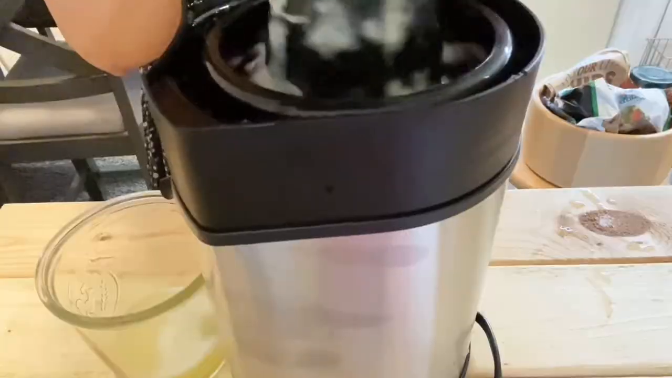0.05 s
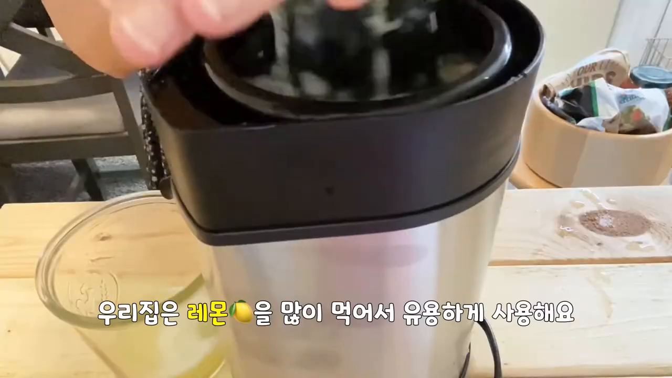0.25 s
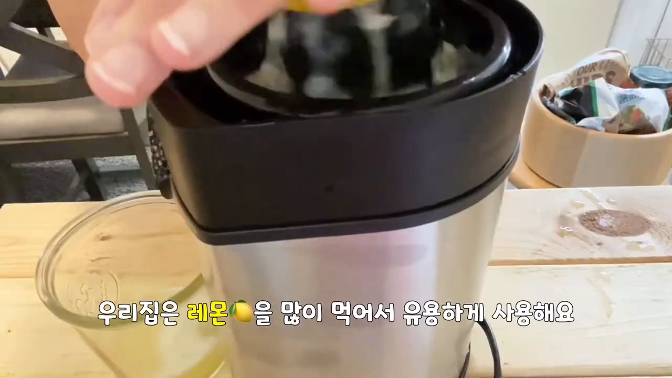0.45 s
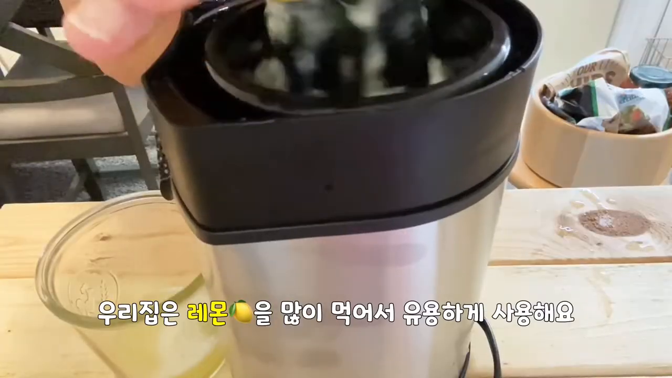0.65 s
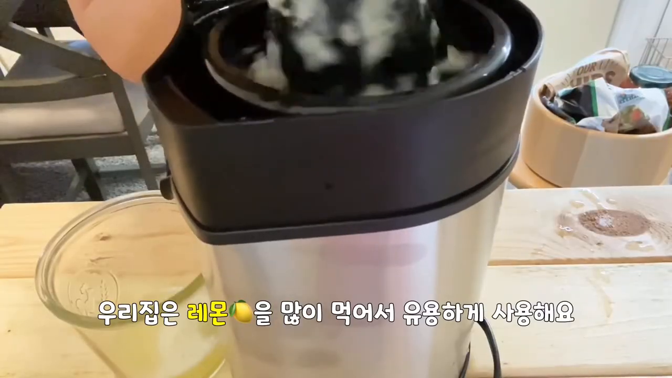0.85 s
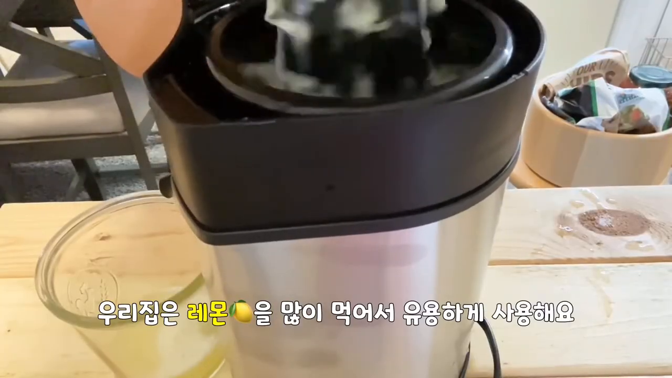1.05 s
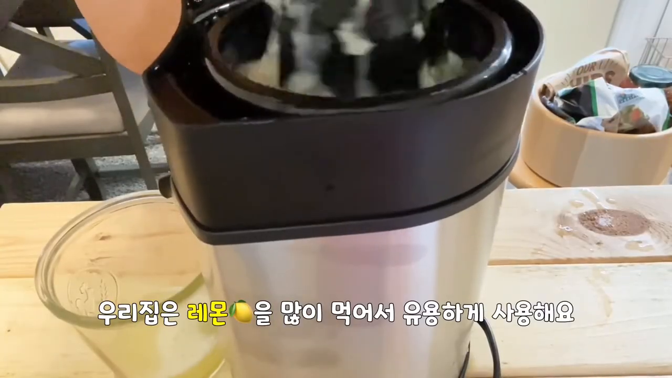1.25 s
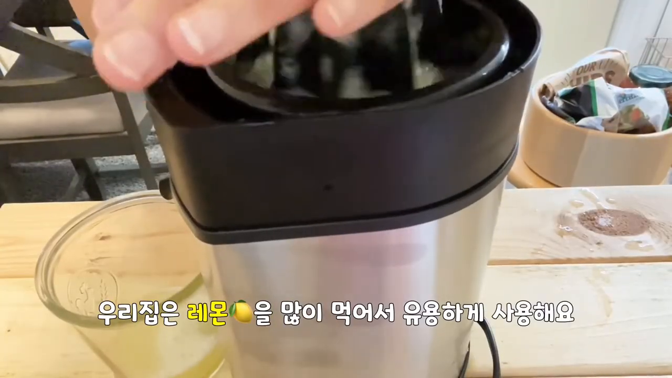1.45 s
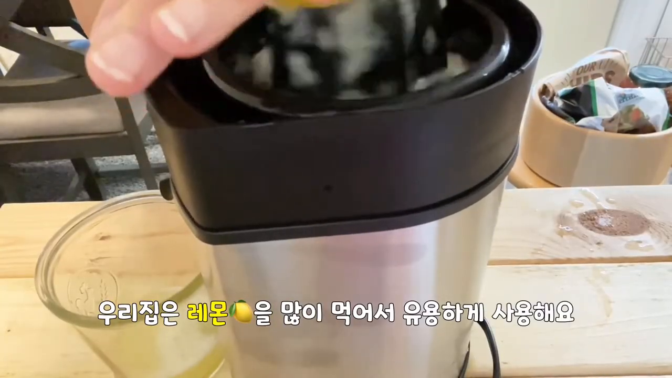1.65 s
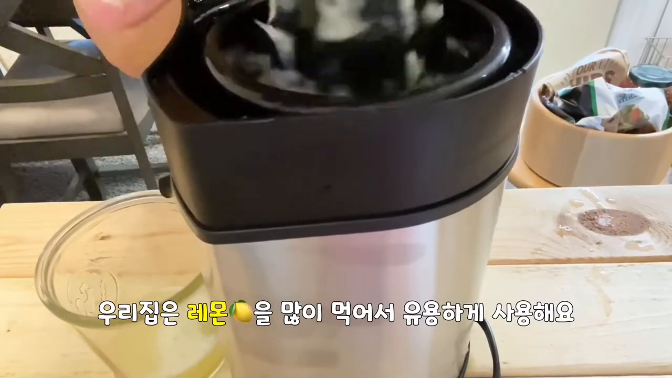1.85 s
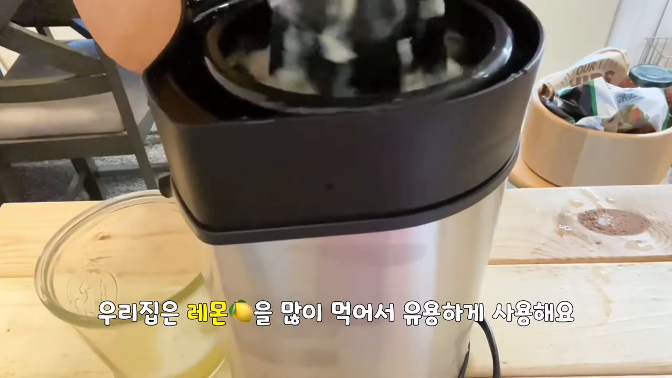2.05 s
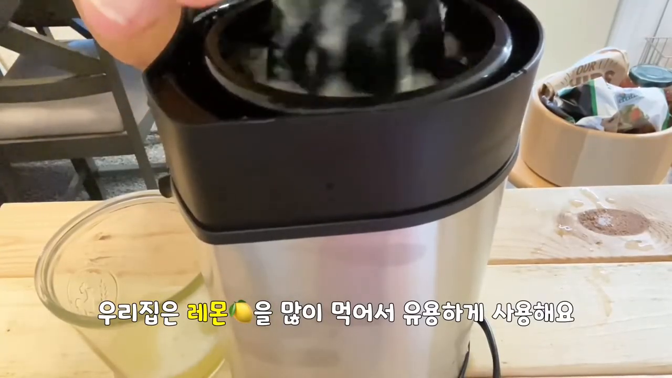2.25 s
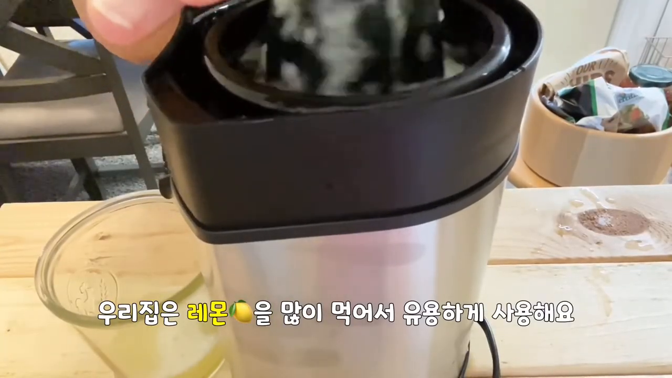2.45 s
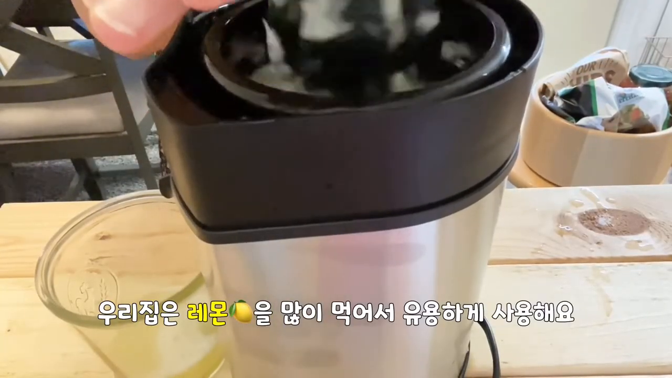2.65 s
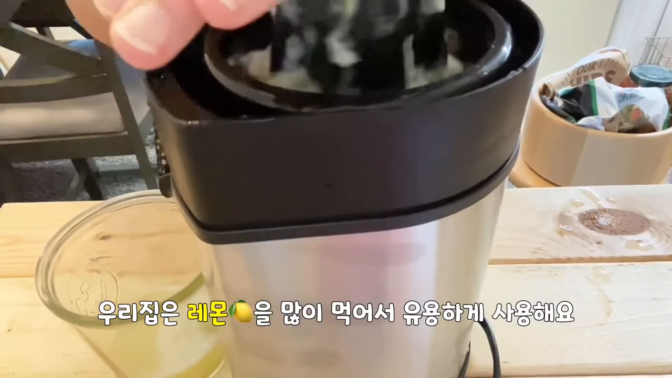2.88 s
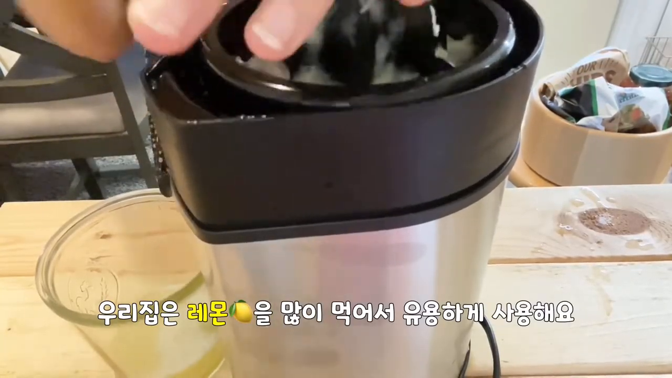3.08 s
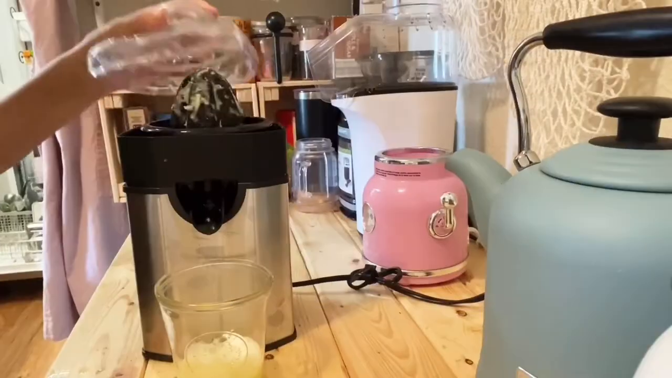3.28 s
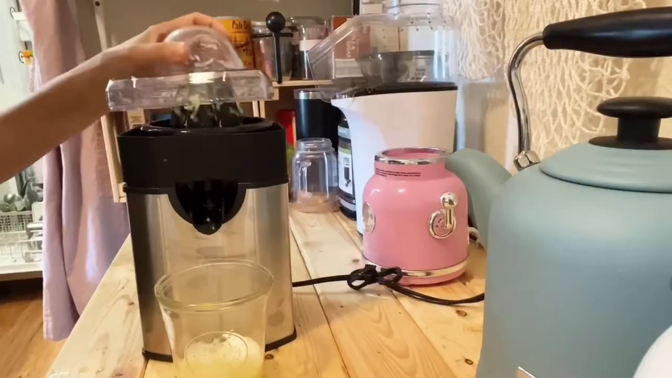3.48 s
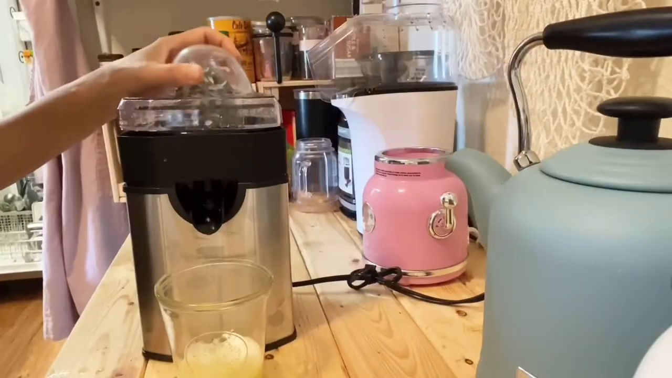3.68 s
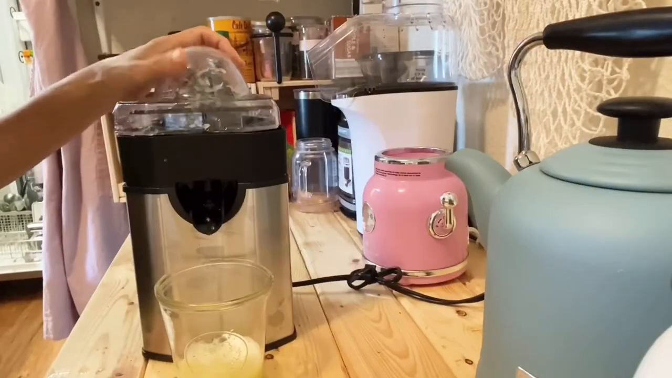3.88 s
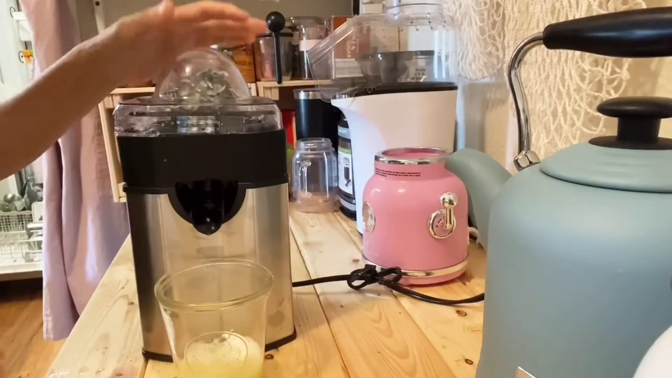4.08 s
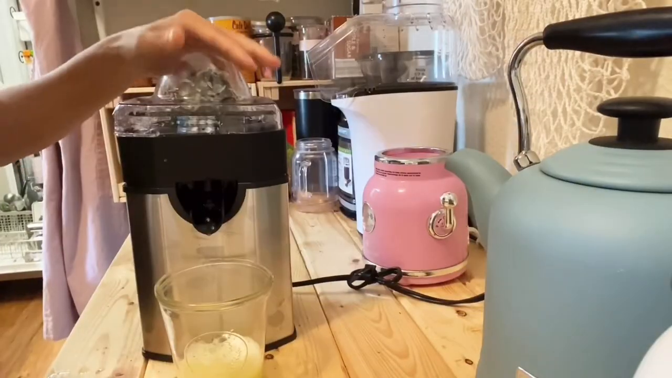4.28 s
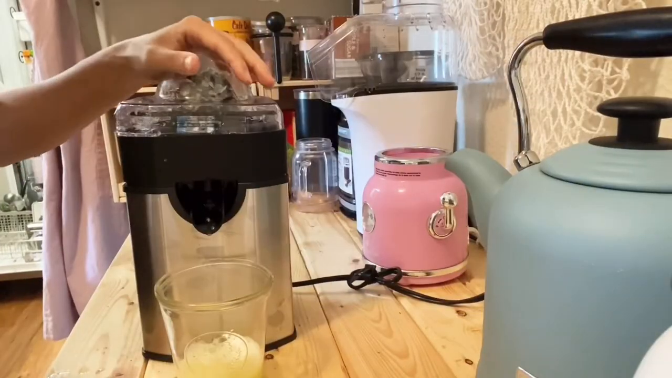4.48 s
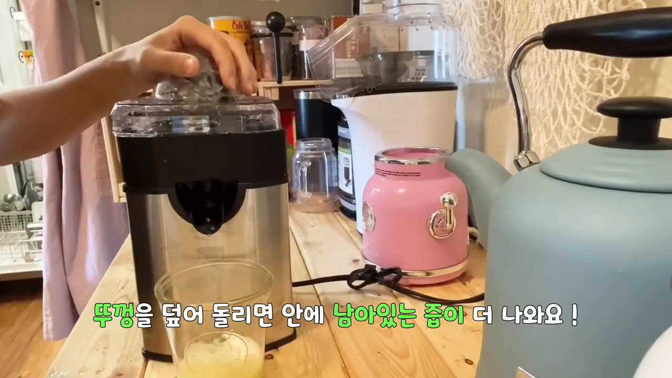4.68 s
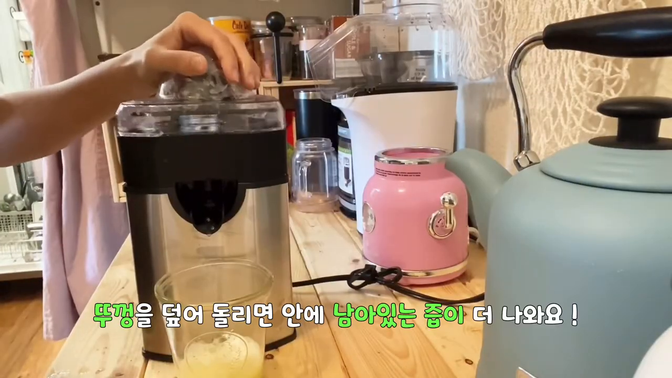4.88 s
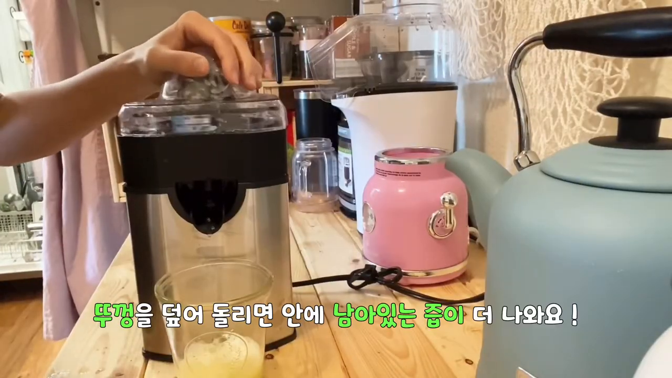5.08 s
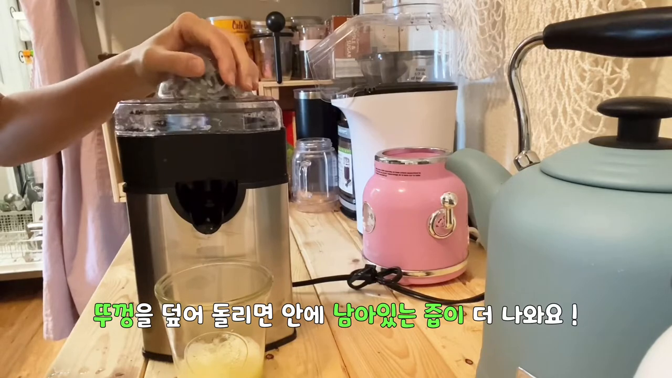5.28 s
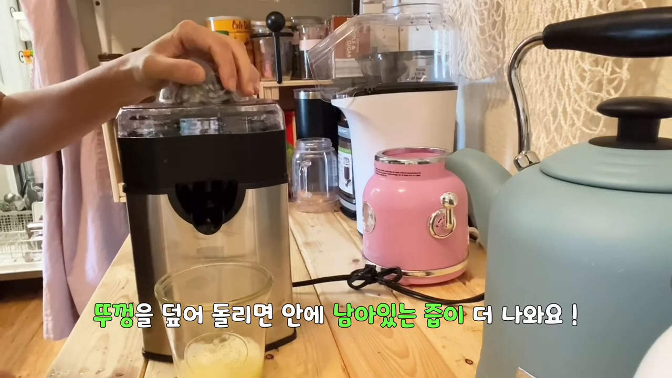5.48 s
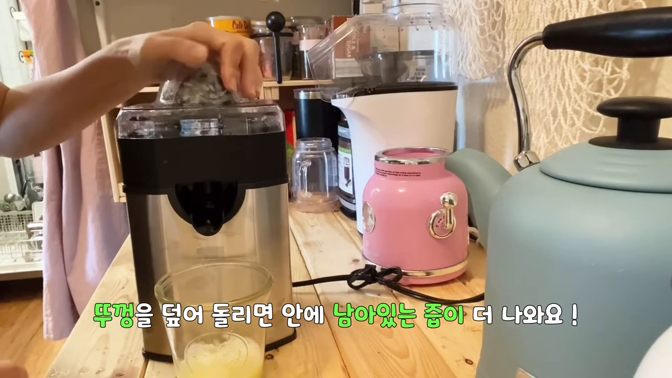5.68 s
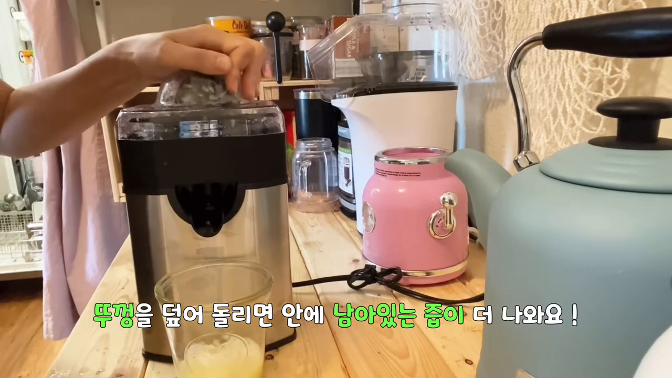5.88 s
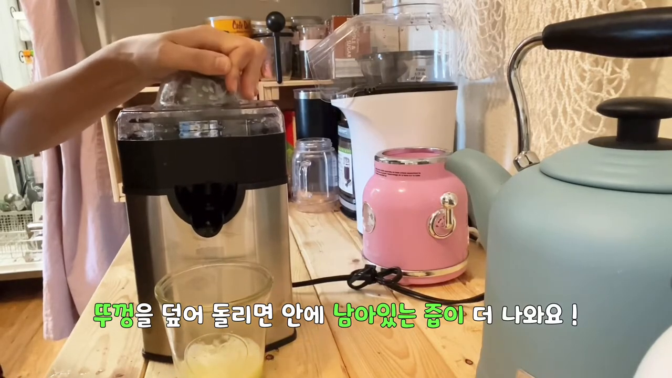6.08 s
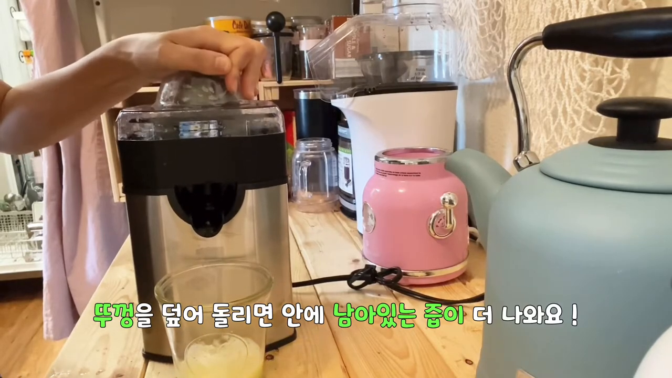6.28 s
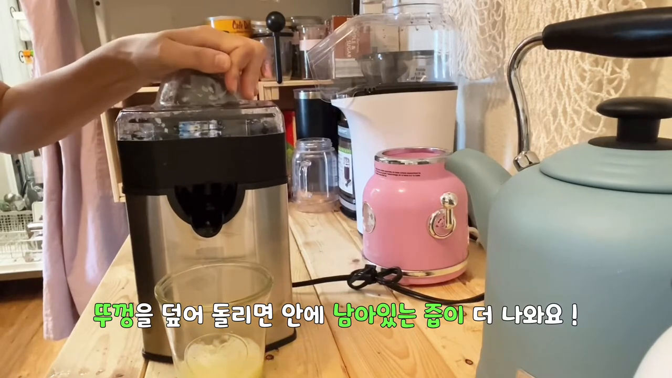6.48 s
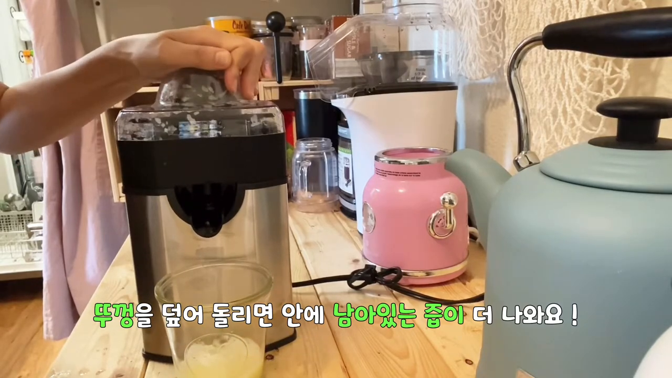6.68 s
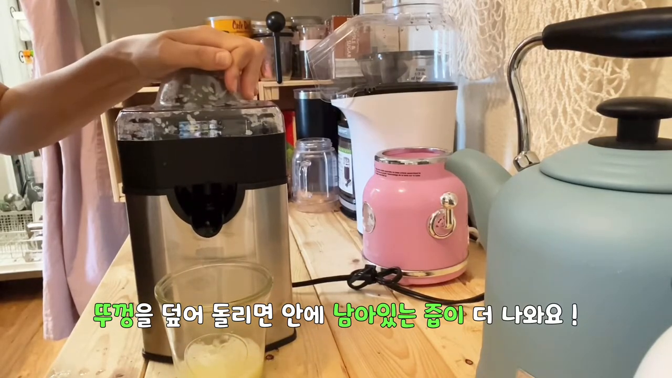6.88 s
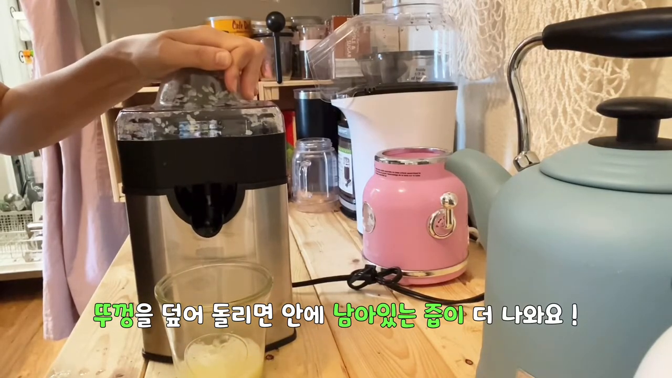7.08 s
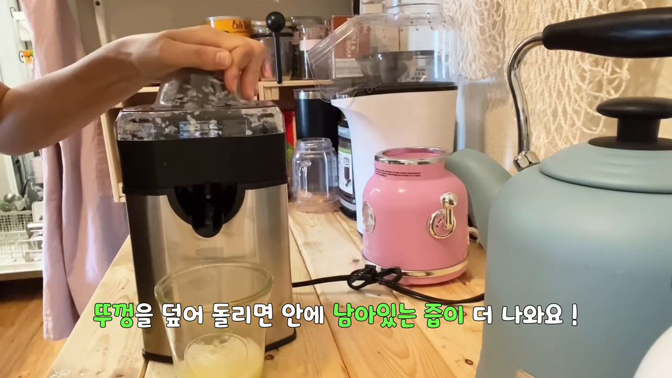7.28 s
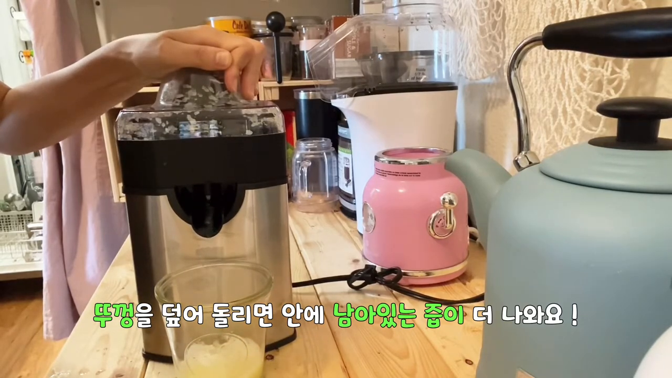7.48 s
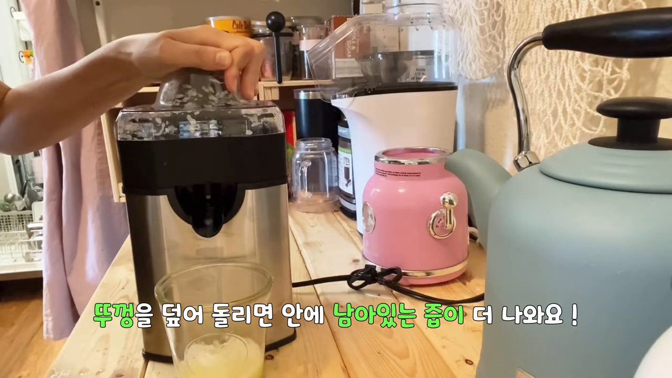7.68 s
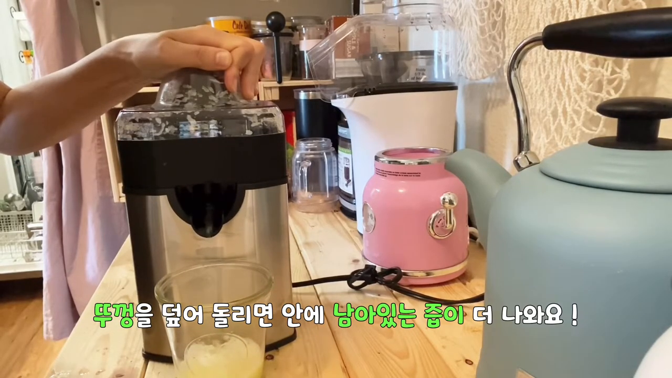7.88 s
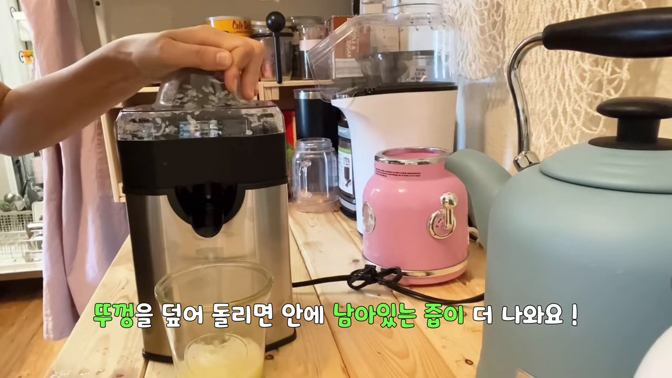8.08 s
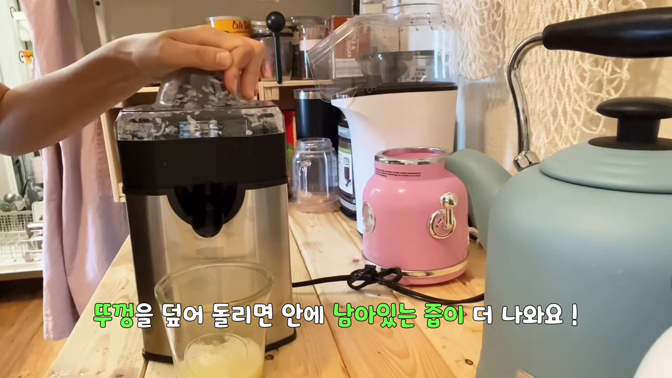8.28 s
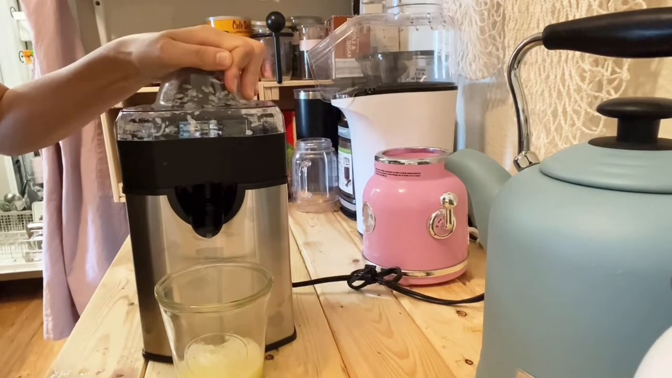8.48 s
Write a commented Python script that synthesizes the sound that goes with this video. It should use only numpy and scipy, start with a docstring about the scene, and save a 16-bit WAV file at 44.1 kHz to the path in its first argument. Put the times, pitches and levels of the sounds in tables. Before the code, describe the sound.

Close in a home kitchen, a small electric citrus juicer runs with buzzing mains hum, rattling gears and wet pulp crunches. It stops abruptly at three seconds. A hollow plastic lid is knocked, scraped and snapped on over faint appliance murmur. Then a few hard clacks, a quick rising whine, and the motor runs again, growing into a grind with lid chatter and squeaks to the end.

```python
"""A bare electric citrus juicer is heard first, its mains-locked motor humming and its gears rattling on a wooden table.
After a sudden stop a plastic lid is set on, nudged and snapped home; a hand presses it, the drive catches with a few
clacks and the lid chatters on the spinning reamer. Sine lines give the hum and drone; random strikes and noise, filtered
by resonant bodies, give gears, rumble and chatter; short noise bursts give the knocks. Appliances murmur behind."""
import sys
import numpy as np
from scipy import signal
from scipy.fft import rfft, irfft, next_fast_len
from scipy.io import wavfile
from scipy.ndimage import uniform_filter1d

SR = 44100
rng = np.random.default_rng(int(sys.argv[2]) if len(sys.argv) > 2 else 0)


def master_out(mix):
    """Clip the mix to full scale and print it as 16-bit PCM to the path in sys.argv[1]."""
    frames = np.transpose(np.atleast_2d(mix))
    ceiling = np.clip(frames, -1, 1)
    pcm = np.round(ceiling * 32767).astype(np.int16)
    wavfile.write(sys.argv[1], SR, pcm)


N = 376613
T = np.arange(N) / SR  # time, s
LEFT_RIGHT = np.array([[1], [-1]])  # opposite signs on the two sides

# Motor lines. Each row: multiple of the mains frequency, level in dB bare, lightly pressed, pressed hard.
MOTOR_LINES = [(1.992, -35, -52, -53), (4.003, -41, -51, -46), (5.97, -51, -59, -51),
               (8.026, -35.5, -49, -52), (9.96, -36, -43, -51), (12.01, -39, -38.5, -39.5),
               (12.93, -49.5, -54, -41), (14.1, -64.5, -38.5, -37.5), (15.15, -37, -47, -44),
               (15.92, -52.5, -35.5, -38), (16.9, -40, -40, -38.5), (18.02, -41, -54, -48.5),
               (25.5, -54, -49, -57), (28.3, -59.5, -41, -50), (29.6, -54.5, -50, -43)]
# Drone of the loaded drive. Each row: frequency in Hz, level in dB against the rumble.
DRIVE_DRONE = [(81.5, -22), (107.5, -15), (143, -1), (179.5, -6)]

# Broad colours of the parts. Each row of these: frequency in Hz, relative spectral level in dB per Hz.
# Gears and table under the bare reamer
BARE_GEAR_COLOUR = [(230, -36), (330, -19), (450, -11), (530, -7), (800, -1), (1000, -6), (1400, -11),
                    (2300, -18), (4200, -27), (7400, -26), (9400, -29), (13800, -33), (15200, -54)]
BARE_RUMBLE_COLOUR = [(15, -32), (25, -27), (70, -4), (118, -2.5), (192, -4.5), (241, -12), (290, -15),
                      (330, -25), (430, -39), (730, -120)]
# Gears of the lightly loaded drive, then of the pressed one
IDLE_GEAR_COLOUR = [(30, -50), (150, -28), (350, -20), (520, -10), (700, -6), (900, -4), (1030, -6),
                    (1200, -18), (1480, -12.5), (1780, -12), (2200, -17), (2450, -27), (3500, -31),
                    (4600, -31), (5500, -36), (7400, -35), (8200, -41), (13500, -46), (15000, -66)]
LOADED_GEAR_COLOUR = [(30, -62), (150, -26), (300, -11.5), (420, -5.5), (550, -8), (680, -6), (880, -2),
                      (1030, -2), (1200, -15.5), (1700, -10.5), (2200, -19.5), (2900, -20), (6000, -40),
                      (15000, -95)]
# Chatter of the lid, rumble of the table, and what a rib excites in the lid
CHATTER_COLOUR = [(40, -50), (600, -22), (1500, -4), (2200, 1), (3000, -3), (4400, -2), (5200, -7),
                  (7400, -9), (9300, -13), (13500, -17), (15000, -38)]
PRESSED_RUMBLE_COLOUR = [(25, -32), (40, -19), (55, -12), (90, 9.5), (150, 2.5), (210, -3), (300, -3.5),
                         (450, -41.5)]
RIB_BRUSH_COLOUR = [(40, -48), (800, -4.5), (1600, 5), (2200, 4), (3100, -4), (3950, 2), (4500, -7),
                    (5400, -1), (7500, -24), (15000, -52)]
# Lid knocks and scrapes, hard clacks, rib ticks and dull judders
KNOCK_COLOUR = [(60, -9), (250, -1.5), (400, 0), (600, 8.5), (950, 1), (1300, -3.5), (1700, -2.5),
                (2300, -8.5), (3400, -13), (4500, -19), (9000, -30), (16000, -52)]
CLACK_COLOUR = [(80, -6.5), (300, -4.5), (600, -0.5), (900, 7), (1300, -3.5), (2200, 1), (3200, -6.5),
                (5000, -7.5), (8000, -15.5), (14000, -37), (16000, -23.5)]
TICK_COLOUR = [(300, -18), (900, 9.5), (1400, 7), (2200, 15.5), (3000, 1.5), (4300, 1.5), (5800, -4),
               (9000, -7), (15000, -51)]
JUDDER_COLOUR = [(100, -26.5), (400, -19), (650, -8), (880, -1), (1100, -6.5), (1500, -21), (2200, -9),
                 (4000, -33), (15000, -72)]
# Pulp on the strainer, and the murmur of the kitchen
STRAINER_COLOUR = [(300, -8.5), (1400, 2.5), (3800, 3), (8000, -12)]
KITCHEN_COLOUR = [(25, -20), (51, -4.5), (72, -7), (140, -7), (190, -16), (260, -16), (600, -28),
                  (1000, -31), (1400, -36), (2400, -40), (4000, -54), (8000, -60), (15000, -85)]

# Resonances. Each row of these: frequency in Hz, width in Hz, height in dB above the colour.
# Housing with the reamer bare
HOUSING_MODES = [(467.7, 15, 9), (575, 89, 2), (717, 17, 7), (836, 103, 7), (1078, 41, 10.5),
                 (1302, 33, 5.5), (1940, 48, -3), (2248, 14, 7.5), (2800, 25, 5.5), (2724, 5.1, 9),
                 (3730, 74, 7), (7390, 440, 6.5), (8600, 330, 3.5), (11560, 210, -1.5), (13100, 370, 3.5)]
# Lightly loaded drive
IDLE_MODES = [(681, 17, 9.5), (880, 270, 5), (1430, 25, 9), (1540, 31, 8), (1760, 130, 4.5), (2130, 25, 6),
              (2560, 35, 11), (3000, 94, 8), (3300, 110, 9), (4460, 92, 7), (5900, 220, 10.5),
              (6460, 94, 10), (7300, 320, 8)]
# Housing covered by the lid
COVERED_MODES = [(513, 50, 9), (570, 38, 11.7), (734, 13, 10), (883, 69, 8.6), (1020, 2.8, 4.2),
                 (1222, 18, 11.4), (1780, 880, 3.6), (3930, 95, 5.4), (4540, 160, 8), (7520, 1200, 4)]
# Upper resonances of the lid
LID_MODES = [(1654, 70, 7), (2200, 90, 7), (2910, 60, 7), (3360, 90, 9)]
# Seated lid on its housing, damped by the hand
SEATED_MODES = [(560, 110, 7.5), (890, 140, 6), (1770, 900, 3), (3880, 200, 4), (4500, 200, 4)]

# How far the two sides differ. Each row of these: frequency in Hz, side against middle in dB.
BARE_SIDES = [(100, -15), (300, 2), (950, -15), (1800, 3), (4000, 1), (7000, -3), (14000, 1)]
PRESSED_SIDES = [(100, -43), (300, -20), (550, -7), (950, 4), (1800, -18), (4000, -17), (7000, -1)]
HANDLING_SIDES = [(100, -18), (500, -2), (1500, -5.5), (7000, -2.5)]

# The hand bears down, then eases a little. Each row: time in seconds, gear level in dB.
HAND_EFFORT = [(5.98, -32.5), (6.53, -28.5), (7.06, -19.5), (8.01, -22), (8.54, -23)]
# The pressed lid shudders in short bursts. Each row: pitch in Hz, length in seconds, bursts per second,
# level in dB against the chatter.
LID_SHUDDERS = [(873, 0.0076, 30, 9), (2074, 0.0038, 70, 4.5), (3880, 0.0052, 40, -4),
                (4480, 0.0048, 45, -5.5)]
# The lid slides on the rim. Each row: start in seconds, length in seconds, level in dB.
LID_SCRAPES = [(3.739, 0.069, -33), (3.801, 0.048, -45), (3.877, 0.15, -45.5), (3.99, 0.085, -45),
               (4.378, 0.075, -66), (4.634, 0.038, -53.5), (4.91, 0.03, -54), (5.143, 0.036, -47),
               (5.339, 0.024, -43), (5.354, 0.29, -59.5), (5.675, 0.13, -65.5)]
# The lid knocks on the rim. Each row: start in seconds, contact peak in dB, rattle length in seconds,
# low ring in Hz, its level in dB, upper ring in Hz, its level in dB, ring t60 in seconds, left minus right in dB.
LID_KNOCKS = [(3.6988, -22.5, .014, 684, -22, 1585, -25.5, 0.098, -1.5),
              (3.757, -17.5, 0.017, 635, -24, 1467, -12.5, 0.067, .5),
              (3.765, -18.5, 0.013, 620, -21.5, 1614, -16, 0.093, -1),
              (3.78, -26.5, 0.01, 666, -32, 1460, -23, 0.073, 0),
              (3.9427, -27, 0.0096, 574, -19.5, 1440, -27, 0.1, 1.5),
              (3.96, -22.5, 0.0098, 604, -31, 1460, -36, .07, -2),
              (3.977, -18, .012, 560, -14.5, 1524, -16.5, 0.08, 0),
              (3.996, -19, .003, 583, -18, 1290, -23, 0.049, -1.5),
              (4.019, -30, .015, 557, -25.5, 1200, -28.5, 0.091, .5),
              (4.4165, -34, 0.0074, 520, -32.5, 1570, -56, 0.073, 2),
              (4.574, -61, 0.0048, 520, -52, 1500, -62, .04, 0),
              (4.654, -34, 0.0058, 530, -23, 1600, -44, 0.048, 2),
              (4.668, -34.5, 0.012, 567, -35, 2080, -42, .04, -1.5),
              (4.799, -32, 0.015, 488, -27, 1410, -36, .06, .5),
              (4.821, -30.5, 0.0089, 500, -30, 1630, -46, 0.054, -1),
              (4.932, -29.5, 0.0055, 535, -37, 1600, -38, 0.049, .5),
              (4.948, -26, 0.015, 450, -30, 1630, -40, 0.048, 1),
              (4.9688, -18, 0.009, 503, -19, 1470, -28, 0.055, 1),
              (5.008, -40, .02, 450, -33, 1450, -35, 0.058, 0),
              (5.162, -24, 0.013, 466, -17.5, 1480, -24, 0.037, 2),
              (5.18, -20.5, .009, 576, -23, 1670, -30, 0.068, 0)]
# The hollow body thumps on the table. Each row: start in seconds, peak in dB, pitch in Hz, t60 in seconds.
BODY_THUMPS = [(3.769, -38, 227, 0.19), (4.002, -30.5, 108, 0.2), (4.04, -32, 125, 0.15),
               (4.965, -28, 135, 0.14), (5.236, -27, 133, 0.074), (5.378, -3, 220, 0.026),
               (5.38, -22.5, 122, 0.2)]
# The drive ticks, catches and kicks; the lid snaps home. Each row: start in seconds, peak in dB,
# brightness in dB per octave, main ring in Hz.
HARD_CLACKS = [(0.322, -12.5, 14.5, 12300), (5.353, -7.5, 0, 2340), (5.361, -8, -6.5, 500),
               (5.3711, -12, 3.5, 373), (5.803, -30.5, 7, 3960), (5.8094, -19.5, -1.5, 960),
               (5.83, -15, -1, 910), (5.8439, -4.5, -1.5, 2330), (5.8996, -10, -3, 4350),
               (5.922, -8, -1, 890), (5.9274, -3.5, -3.5, 860)]
# A rib of the reamer snags hard on the lid. Each row: start in seconds, tick peak in dB, squeak peak in dB,
# squeak pitch in Hz.
RIB_FLICKS = [(6.751, -20.5, -32, 4330), (6.9206, -16.5, -38, 3610), (6.9364, -10.5, -23, 4400),
              (6.9535, -15.5, -21, 4200), (7.0187, -25.5, -31, 4520), (7.0374, -12.5, -23, 3930),
              (7.072, -15, -14, 3950), (7.1166, -12.5, -14, 4470), (7.1827, -28.5, -21, 4460),
              (7.317, -25, -16.5, 4480), (7.334, -16, -20, 4560), (7.4666, -9.5, -12.5, 4560),
              (7.6388, -9.5, -21, 4070), (8.017, -18.5, -24, 4600), (8.1015, -16, -26, 4130),
              (8.201, -16.5, -24, 3900), (8.2338, -9.5, -25, 3860), (8.3578, -15.5, -23, 4000),
              (8.367, -12.5, -27, 4180), (8.417, -24.5, -19.5, 4580), (8.501, -9.5, -23, 3780)]
# Lumps of pulp crunch under the bare reamer. Each row: start in seconds, peak in dB, resonance in Hz.
PULP_CRUNCHES = [(0.2512, -16, 2270), (0.376, -15.5, 1780), (0.5003, -15, 1540), (0.535, -17.5, 1820),
                 (1.1345, -14, 2700), (1.137, -12, 1000), (1.9954, -23, 1580), (2.161, -18, 3300),
                 (2.454, -17.5, 1810), (2.6289, -16, 1520), (2.6853, -17, 1500), (2.705, -17, 1820),
                 (2.7767, -17, 1650)]
# The pressed lid judders. Each row: start in seconds, peak in dB.
LID_JUDDERS = [(6.902, -9.5), (6.95, -10.5), (7.069, -9), (7.106, -13.5), (7.12, -6.5), (7.192, -12.5),
               (7.257, -13), (7.29, -7), (7.3365, -5.5), (7.407, -9.5), (8.07, -9.5), (8.254, -8)]
# Steady tones of the appliances. Each row: frequency in Hz, level in dB.
APPLIANCE_TONES = [(70, -52), (188.4, -59), (527.6, -70.5), (1050, -72.5), (2272, -79.5), (6520, -99),
                   (6702, -90)]

MAINS_HZ, TOP_HZ = 60, 15500
BARE_STOP_S, PRESS_S = 3.095, 5.81
BARE_GEAR_DB = -23.5
# scraping grows as pulp gathers on the strainer; levels against the gears
PULP_DB, PULP_FROM_S, PULP_BUILD_S, PULP_GAIN_DB = -14, 2.08, 0.36, 5
CONTACT_S, CONTACT_RISE_S = 6.17, 0.89  # the lid comes to bear on the reamer
STRAIN_S, STRAIN_RISE_S = 6.28, 0.4  # the motor labours: its hum shifts and wavers
FULL_EFFORT_DB = -21  # gear level at which the next two levels hold
CHATTER_DB, CHATTER_DB_PER_DB = -37, 0.9  # level; growth with the gear level
RUMBLE_DB, RUMBLE_DB_PER_DB = -37.5, 1  # the same for the table's rumble
RIB_FROM_S, RIB_RISE_S, RIB_BRUSH_S = 6.8, 0.18, 0.0019  # the ribs reach the lid; time constant of one brush
RIB_HZ, RIB_JITTER = 46.9, .16  # rib passes per second; spread of their timing in periods
RIB_DB, RIB_SCATTER_DB = -2.5, 3  # level against the chatter; spread of single passes
SPIN_S, SPIN_LENGTH_S, SPIN_FROM_HZ, SPIN_HZ_PER_S, SPIN_DB = 5.852, 0.056, 900, 16000, -28  # gear whine
SLACK_S, SLACK_LENGTH_S, SLACK_DB = 5.82, 0.14, -29  # the gears rattle while they take up their slack
BOUNCE_DB, RING_RISE_S = -1, 0.0013  # change from one small contact to the next; swell of the ring
MOTTLE_DB, MOTTLE_HZ = 5, 115  # depth and spacing of the plastic's small resonances
KITCHEN_DB = -52  # each of the murmur's middle and side parts, before the side weight


def bare_run():
    """Forced vibration: loose gears excite the housing, which shakes the table, while the bare reamer spins."""
    gear_db = BARE_GEAR_DB + .7 * walk(11)
    housing = body(BARE_GEAR_COLOUR, HOUSING_MODES)
    gears = (ring(bare_teeth(), housing) + pulp_scraping()) * undb(gear_db)
    shaking = rattle(rate=400, scatter_db=2.5, throb=0.5, wobble=0.055, rub=0.68)
    rumble = ring(shaking, body(BARE_RUMBLE_COLOUR)) * undb(-33.5)
    sound = kitchen(gears + rumble, BARE_SIDES, wet_db=-3.0, t60=0.21)
    # the two flanks of the housing buzz on their own
    flanks = undb(gear_db - 19.0) * ring(rng.standard_normal(N), housing)
    sound = sound + flanks * LEFT_RIGHT
    sound = sound + hum([bare for _, bare, _, _ in MOTOR_LINES], waver=0.2)
    running = ramp(-0.053, 0.13) * (1 - ramp(BARE_STOP_S, 0.042)) ** 2
    return sound * undb(-0.47 * LEFT_RIGHT) * running


def bare_teeth():
    """Impact and friction: strikes of the teeth fill the middle range, an even rubbing the treble."""
    strikes = rattle(rate=500, scatter_db=-0.5, throb=0.16, wobble=0.26, rub=0.93)
    strikes = unit(strikes * undb(1.65 * walk(70)))
    rubbing = unit(rattle(rate=4000, scatter_db=6.0, throb=0.13, wobble=0.22, rub=1.3))
    low, high = (signal.butter(2, 4000, kind, fs=SR, output="sos") for kind in ("low", "high"))
    return signal.sosfilt(low, strikes) + signal.sosfilt(high, rubbing)


def pulp_scraping():
    """Stick-slip friction: bits of pulp scrape along the strainer and excite its resonances."""
    force = shudder(1650, 0.003, 90, scatter_db=14)
    force = force + undb(-2.5) * shudder(2370, 0.0032, 110, scatter_db=16)
    force = force + undb(-10.5) * shudder(3140, 0.0025, 130, scatter_db=19)
    level_db = PULP_DB + PULP_GAIN_DB * ramp(PULP_FROM_S, PULP_BUILD_S) + 2.0 * walk(25.2)
    return ring(force, body(STRAINER_COLOUR, HOUSING_MODES, mottled=True)) * undb(level_db)


def pressed_run():
    """Loading of a drive: as the hand bears down, whirr turns to grinding, the drive drones, the lid chatters."""
    gear_db = np.interp(T, *np.transpose(HAND_EFFORT))
    load_db = gear_db - FULL_EFFORT_DB
    contact = ramp(CONTACT_S, CONTACT_RISE_S)
    jolt = walk(70) * contact
    gears = loaded_gears(contact) * undb(gear_db + 0.41 * jolt)
    rumble = loaded_rumble(contact) * undb(RUMBLE_DB + RUMBLE_DB_PER_DB * load_db)
    chatter = contact * lid_chatter(jolt) * undb(CHATTER_DB + CHATTER_DB_PER_DB * load_db)
    sound = kitchen(gears + rumble + spin_up(), PRESSED_SIDES, wet_db=-4.0, t60=0.327)
    sound = sound + kitchen(chatter, PRESSED_SIDES, wet_db=-2.5, t60=0.39)
    strain = ramp(STRAIN_S, STRAIN_RISE_S)
    levels_db = [light + strain * (hard - light) for _, _, light, hard in MOTOR_LINES]
    sound = sound + hum(levels_db, waver=.25 + .3 * strain)
    return sound * undb(-0.24 * LEFT_RIGHT) * ramp(PRESS_S, 0.031)


def loaded_gears(contact):
    """Change of excitation under load: a power crossfade from the whirr of the light drive to grinding."""
    light = rattle(rate=700, scatter_db=4, throb=0.18, wobble=0.1, rub=0.7)
    heavy = rattle(rate=600, scatter_db=0.0, throb=0.097, wobble=0.04, rub=0.86)
    whirr = ring(light, body(IDLE_GEAR_COLOUR, IDLE_MODES))
    grind = ring(heavy, body(LOADED_GEAR_COLOUR, COVERED_MODES))
    return np.sqrt(1 - contact) * whirr + undb(-2.0) * np.sqrt(contact) * grind


def loaded_rumble(contact):
    """Low-frequency radiation: noise through the table, joined by wavering drive tones as the lid bears."""
    drone = sum(np.sqrt(2) * undb(db) * np.sin(2 * np.pi * hz * T + 0.32 * walk(2.8))
                for hz, db in DRIVE_DRONE)
    return undb(1.0) * ring(rng.standard_normal(N), body(PRESSED_RUMBLE_COLOUR)) + contact * drone


def lid_chatter(jolt):
    """Contact vibration: the lid is tapped and scraped, shudders in squeaks and is brushed by the ribs."""
    taps = rattle(rate=400, scatter_db=3.5, throb=.3, wobble=.15, rub=.9) * undb(1.4 * jolt)
    scrape = ring(taps, body(CHATTER_COLOUR, COVERED_MODES)) * undb(-0.9)
    squeaks = sum(undb(db) * shudder(hz, length, rate, scatter_db=12)
                  for hz, length, rate, db in LID_SHUDDERS)
    squeaks = squeaks * ramp(RIB_FROM_S, RIB_RISE_S) * unit(undb(1.5 * walk(22)))
    return scrape + squeaks + undb(RIB_DB) * ribs()


def ribs():
    """Periodic excitation with jitter: ribs brush the lid one after another and set its resonances ringing."""
    force, t = np.zeros(N), T[:SR // 50]
    for k, (late, size) in enumerate(np.clip(rng.standard_normal((200, 2)), -2, 2)):
        start = RIB_FROM_S + (k + RIB_JITTER * late) / RIB_HZ
        brush = rng.standard_normal(len(t)) * t * np.exp(-t / RIB_BRUSH_S)
        if start < T[-1]:
            add(force, start, undb(RIB_SCATTER_DB * size) * brush)
    return ring(force, body(RIB_BRUSH_COLOUR, COVERED_MODES)) * ramp(RIB_FROM_S, RIB_RISE_S)


def spin_up():
    """Rising mesh frequency: slack gears rattle and a rough whine glides up as the motor comes to speed."""
    progress = ramp(SPIN_S, SPIN_LENGTH_S)
    hz = SPIN_FROM_HZ + SPIN_HZ_PER_S * SPIN_LENGTH_S * progress
    whine = np.sin(2 * np.pi * np.cumsum(hz) / SR) * (1 + 0.65 * walk(400))
    whine = whine * undb(SPIN_DB) * np.sin(np.pi * progress) ** 2
    teeth = rattle(rate=530, scatter_db=8.0, throb=0.087, wobble=0.093, rub=0.23)
    slack = ring(teeth, body(CLACK_COLOUR, COVERED_MODES))
    return whine + slack * undb(SLACK_DB) * np.sin(np.pi * ramp(SLACK_S, SLACK_LENGTH_S))


def hum(levels_db, waver):
    """Motor line spectrum: wavering tones at mains multiples, the higher ones out of step on the two sides."""
    out = 0
    for (order, *_), db in zip(MOTOR_LINES, levels_db):
        hz = order * MAINS_HZ
        skew = min(hz / 1500, .6) * rng.choice([-1, 1]) * LEFT_RIGHT
        phase = 2 * np.pi * (hz * T + rng.random()) + waver * walk(8.3)
        out = out + np.sqrt(2) * undb(db) * (1 + waver * walk(12)) * np.sin(phase + skew)
    return out


def rattle(rate, scatter_db, throb, wobble, rub):
    """Random impacts and rubbing noise of loose teeth, hardest on the two torque pulses of each mains cycle."""
    turn = 2 * np.pi * MAINS_HZ * T
    sizes = undb(scatter_db * np.clip(rng.standard_normal(N), -2, 2))
    strikes = (rng.random(N) < rate / SR) * rng.choice([-1, 1], N) * sizes
    torque = np.exp(throb * np.cos(2 * turn) + wobble * np.cos(turn))
    return (unit(strikes) + rub * rng.standard_normal(N)) * torque


def shudder(hz, length, rate, scatter_db):
    """Irregular stick-slip: squeaks of uneven size and pitch at random moments, at rms 1."""
    out, chance = np.zeros(N), rng.random((2500, 3))
    for when, detune, size in chance[:int(rate * T[-1])]:
        squeak = grain(hz * (1 + 0.13 * (detune - .5)), length)
        add(out, when * T[-1], undb(scatter_db * size) * squeak)
    return unit(out)


def grain(hz, length):
    """One stick-slip episode: a short squeak that swells and dies at one pitch."""
    t = T[:int(length * SR)]
    return np.sin(np.pi * t / length) ** 2 * np.sin(2 * np.pi * hz * t)


def handling():
    """Impact and sliding friction: the lid knocks and scrapes on the rim and the body thumps on the table."""
    taps, rings, lean = lid_knocks()
    rings = kitchen(rings, HANDLING_SIDES, wet_db=-11.5, t60=.23)
    contact = kitchen(taps + lid_scrapes() + body_thumps(), HANDLING_SIDES, wet_db=-6.5, t60=0.29)
    return lean * LEFT_RIGHT + rings + contact


def lid_knocks():
    """Impact and free decay: rim contacts, two damped tones (lower once the hand rests), and their side lean."""
    taps, rings, lean, t = np.zeros(N), np.zeros(N), np.zeros(N), T[:SR // 4]
    for start, db, length, low_hz, low_db, high_hz, high_db, t60, pan_db in LID_KNOCKS:
        tap = undb(db) * contacts(length)
        tone = undb(low_db) * np.sin(2 * np.pi * low_hz * t)
        tone = tone + undb(high_db) * np.sin(2 * np.pi * high_hz * t)
        tone = tone * undb(-60 * t / t60) * (1 - np.exp(-t / RING_RISE_S))
        for track, sound in ((taps, tap), (rings, tone)):
            add(track, start, sound)
            add(lean, start, sound * (undb(pan_db / 2) - 1))
    return taps, rings, lean


def contacts(length, count=4):
    """Repeated impact: the rim touches down at a few spots, each with its own colour; peak 1."""
    out = np.zeros(SR // 2)
    for k, late in enumerate(rng.random(count)):
        response = body(KNOCK_COLOUR, LID_MODES, mottled=True, size=2048)
        touch = blow(response, BOUNCE_DB * k, rise=.0006, buzz_t60=.022)
        i = int(length * min(k, 1) * (k - late / 2) / (count - 1) * SR)
        out[i:i + len(touch)] += touch
    return out / np.abs(out).max()


def lid_scrapes():
    """Sliding friction: rough rubbing through the lid, each stroke swelling and fading."""
    out = np.zeros(N)
    force = rattle(rate=1000, scatter_db=7, throb=0, wobble=0, rub=.4)
    rubbing = ring(force, body(KNOCK_COLOUR, [(1500, 300, 2.7)] + LID_MODES, mottled=True))
    for start, length, db in LID_SCRAPES:
        out += rubbing * undb(db) * np.sin(np.pi * ramp(start, length))
    return out


def body_thumps():
    """Damped oscillation: the hollow body answers the table with a low decaying tone."""
    out, t = np.zeros(N), T[:SR // 4]
    for start, db, hz, t60 in BODY_THUMPS:
        add(out, start, undb(db - 60 * t / t60) * np.sin(2 * np.pi * hz * t) * np.minimum(t * hz, 1))
    return out


def clatter():
    """Superposed impacts: clacks, rib flicks, pulp crunches and lid judders share one room."""
    impacts = hard_clacks() + rib_flicks() + pulp_crunches() + lid_judders()
    return kitchen(impacts, HANDLING_SIDES, wet_db=-9.0, t60=0.29)


def hard_clacks():
    """Hard impact: lid and drive strike the seated shell, with one main resonance in each clack."""
    out = np.zeros(N)
    for start, db, tilt_db, ring_hz in HARD_CLACKS:
        modes = SEATED_MODES + LID_MODES + [(ring_hz, ring_hz / 8, 9)]
        response = body(CLACK_COLOUR, modes, tilt_db, mottled=True)
        add(out, start, blow(response, db, rise=0.0033, buzz_t60=0.035))
    return out


def rib_flicks():
    """Snag and release: a rib of the reamer gives the lid a tick and a short squeak."""
    out = np.zeros(N)
    for start, tick_db, squeak_db, hz in RIB_FLICKS:
        response = body(TICK_COLOUR, COVERED_MODES, mottled=True)
        add(out, start, blow(response, tick_db, rise=0.00045, buzz_t60=0.035))
        add(out, start, undb(squeak_db) * grain(hz, length=0.0046))
    return out


def pulp_crunches():
    """Crushing: each lump of pulp sends a brief noise burst through the strainer and one resonance."""
    out = np.zeros(N)
    for start, db, hz in PULP_CRUNCHES:
        response = body(STRAINER_COLOUR, [(hz, hz / 5, 12)], tilt_db=-3.5, mottled=True)
        add(out, start, blow(response, db, rise=0.003, buzz_t60=0.031))
    return out


def lid_judders():
    """Soft impact: the pressed lid judders dully on the covered housing."""
    out = np.zeros(N)
    for start, db in LID_JUDDERS:
        response = body(JUDDER_COLOUR, COVERED_MODES, mottled=True)
        add(out, start, blow(response, db, rise=0.002, buzz_t60=0.025))
    return out


def blow(response, peak_db, rise, buzz_t60):
    """Contact buzz: faces buzz against each other for a moment and the part responds, at a set peak."""
    sound = signal.fftconvolve(burst(T[:SR // 10], rise, buzz_t60), response)
    return sound * undb(peak_db) / np.abs(sound).max()


def room_tone():
    """Partly coherent background: murmur and faint tones of appliances, rising after the first run has ended."""
    mid, left, right = (ring(rng.standard_normal(N), body(KITCHEN_COLOUR)) for _ in range(3))
    murmur = (mid + 0.88 * np.array([left, right])) * undb(KITCHEN_DB + .7 * walk(8))
    tones = sum(np.sqrt(2) * undb(db) * np.sin(2 * np.pi * hz * T + 0.82 * walk(29))
                for hz, db in APPLIANCE_TONES)
    return (murmur + tones) * (ramp(3.22, 0.14) ** 2 + .008)


def kitchen(x, spread, wet_db, t60):
    """Reflection: table and appliances put the sides out of step, equally loud; the room adds a dull tail."""
    size = next_fast_len(N + SR // 10)
    f = np.maximum(np.fft.rfftfreq(size, 1 / SR), 1)
    steps = np.arange(0, SR, 150)
    # which side leads changes at random along the frequency axis
    lead = np.sin(np.pi / 2 * np.interp(f, steps, rng.choice([-1, 1], len(steps))))
    hz, db = np.transpose(spread)
    width = undb(np.interp(np.log(f), np.log(hz), db))
    side = irfft(1j * lead * width * rfft(x, size), size)[:N]  # a quarter period from the middle
    tails = [burst(T[:SR // 2], 0.0071, t60) for _ in range(2)]
    tails = signal.sosfilt(signal.butter(1, [160, 5000], "band", fs=SR, output="sos"), tails)
    wet = signal.fftconvolve(x[None], tails, axes=1)[:, :N]
    return x + side * LEFT_RIGHT + undb(wet_db) * wet


def burst(t, rise, t60):
    """Diffuse decay: a dense, even-coloured cloud of tiny impulses swells and dies; total energy 1."""
    shape = undb(-60 * t / t60) * (1 - np.exp(-(t + 1 / SR) / rise))
    cloud = rng.standard_normal(len(t)) * shape
    # flatten the spectrum and restore the envelope by turns
    for _ in range(5):
        spectrum = rfft(cloud)
        cloud = irfft(spectrum / (np.abs(spectrum) + 1e-12), len(t))
        cloud *= shape / np.sqrt(np.abs(uniform_filter1d(cloud ** 2, size=128)) + 1e-18)
    return cloud / np.linalg.norm(cloud)


def body(colour, modes=(), tilt_db=0, mottled=False, size=8192):
    """Minimum-phase impulse response of a part: a broad colour with resonances standing on it."""
    f = np.maximum(np.fft.rfftfreq(size, 1 / SR), 1)
    hz, db = np.transpose(colour)
    tilt = tilt_db * np.log2(np.maximum(f / 1000, 1 / 4))
    gain = undb(np.interp(np.log(f), np.log(hz), db) + tilt)
    if mottled:
        gain = gain * undb(mottle(size))
    lift = sum((undb(2 * height) - 1) / (1 + (2 * (f - centre) / width) ** 2)
               for centre, width, height in modes)
    # folding the cepstrum makes the response causal
    cepstrum = irfft(np.log(gain * np.sqrt(np.maximum(1 + lift, 1 / 10))))
    cepstrum[1:size // 2] *= 2
    cepstrum[size // 2 + 1:] = 0
    return irfft(np.exp(rfft(cepstrum)))


def mottle(size):
    """Modal density of a plastic shell, in dB: each point of contact favours other small resonances."""
    steps = np.arange(0, SR / 2, MOTTLE_HZ)
    scatter = np.clip(rng.standard_normal(len(steps)), -2, 2)
    db = MOTTLE_DB * scatter * np.minimum(steps / 1500, 1)  # shallower below 1500 Hz
    return np.interp(np.fft.rfftfreq(size, 1 / SR), steps, db)


def ring(force, response):
    """Linear response: a force convolved with a part's impulse response, at rms 1."""
    return unit(signal.oaconvolve(force, response)[:N])


def add(track, start, sound):
    """Superposition: mix a sound into a track at a time in seconds."""
    i = int(start * SR)
    track[i:i + len(sound)] += sound[:N - i]


def undb(db):
    """Amplitude ratio of a level in decibels."""
    return 10 ** (np.asarray(db) / 20)


def unit(x):
    """Normalisation to rms 1."""
    return x / np.sqrt(np.mean(x ** 2))


def ramp(start, length):
    """Linear rise from 0 to 1 in time."""
    return np.clip((T - start) / length, 0, 1)


def walk(rate):
    """Slow fluctuation: a smooth random wander at rms 1."""
    k = max(int(SR / rate), 1)
    held = np.repeat(rng.standard_normal(N // k + 1), k)
    return unit(uniform_filter1d(held, k)[:N])


def scene():
    """Superposition of both runs, the handling between them, the impacts and the background."""
    return bare_run() + pressed_run() + handling() + clatter() + room_tone()


def record(dry):
    """Clipping and band limiting: peaks are cut at full scale, then a low-pass removes the top."""
    low_pass = signal.ellip(8, .2, 70, TOP_HZ, fs=SR, output="sos")
    return signal.sosfilt(low_pass, np.clip(dry, -1, 1))


dry = scene()
out = record(dry)
master_out(out)
```